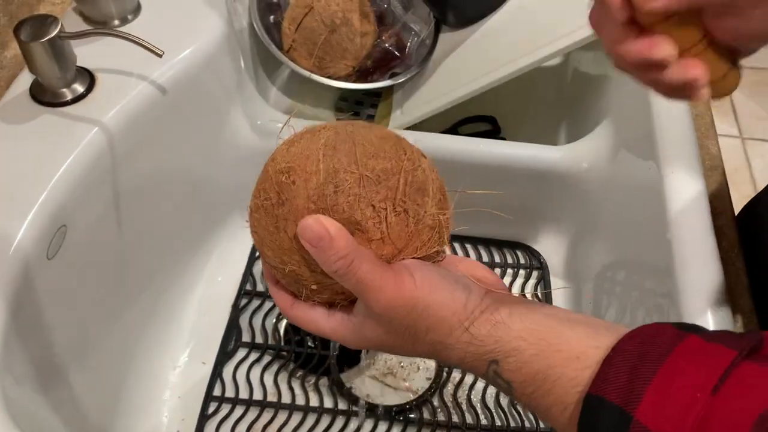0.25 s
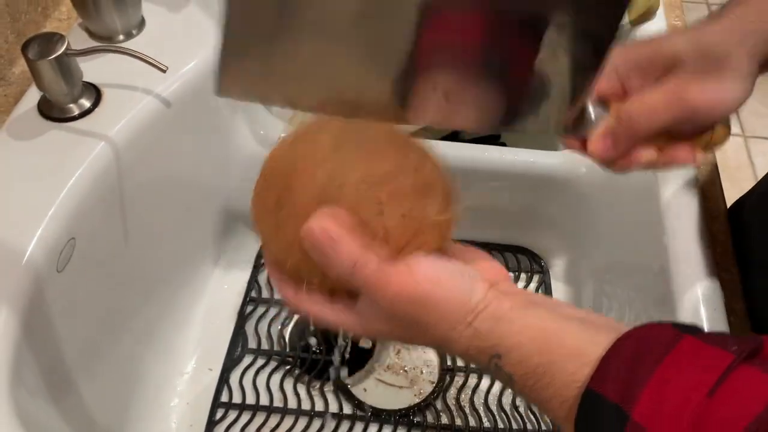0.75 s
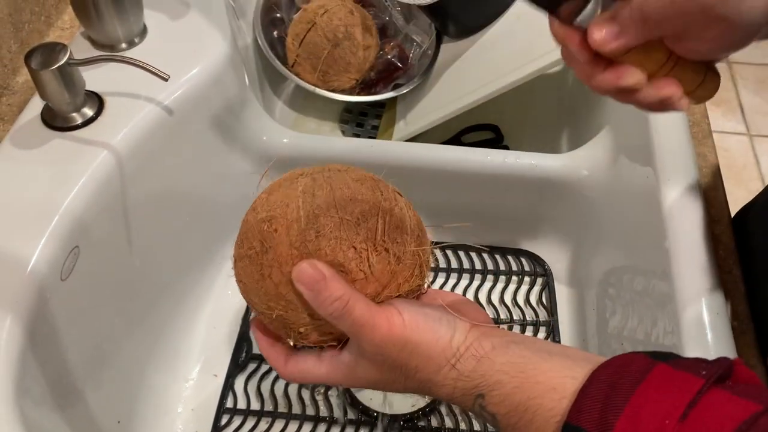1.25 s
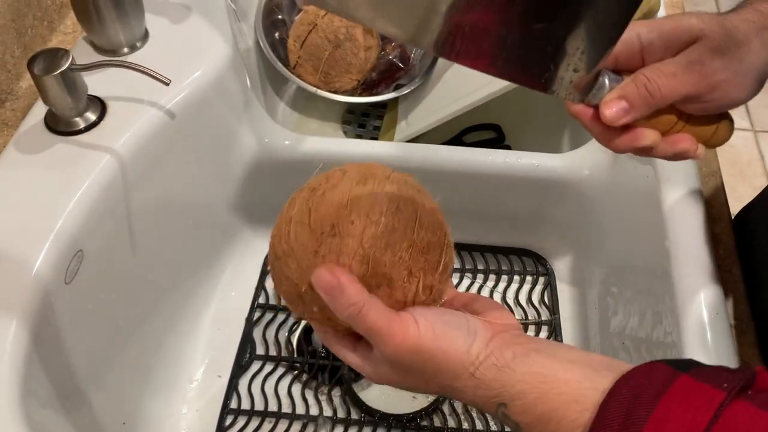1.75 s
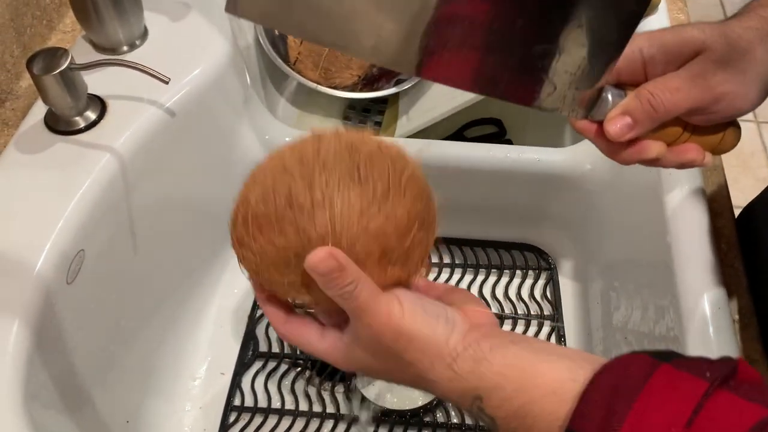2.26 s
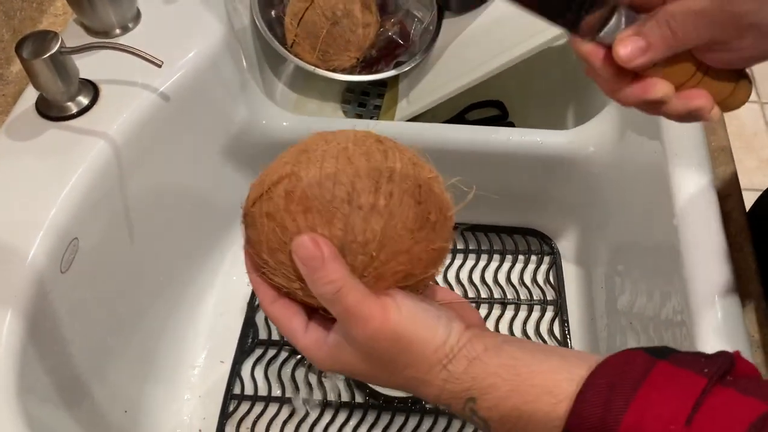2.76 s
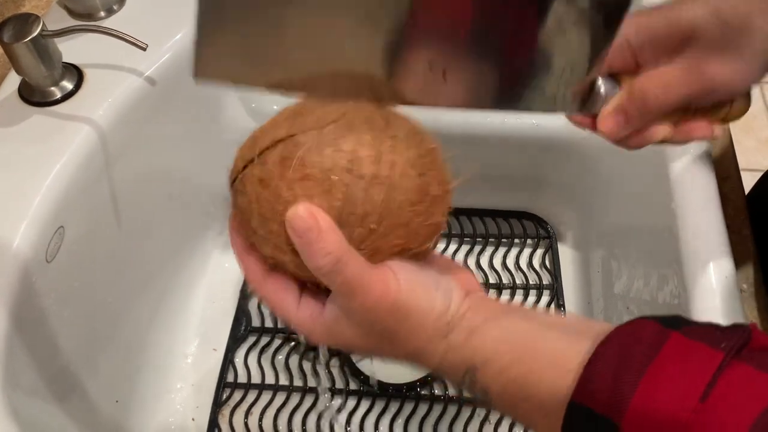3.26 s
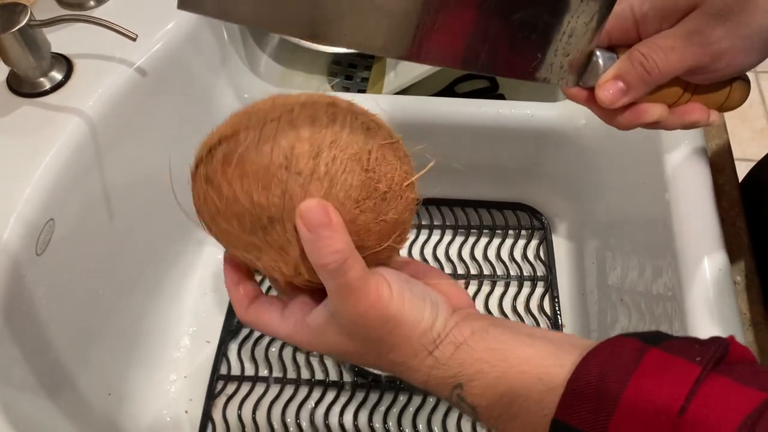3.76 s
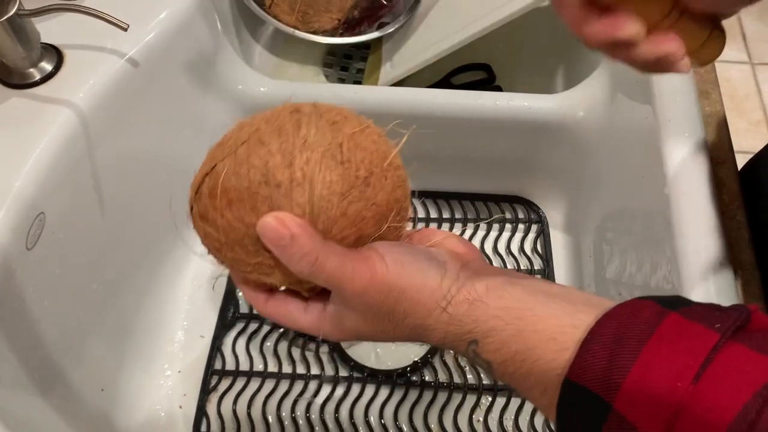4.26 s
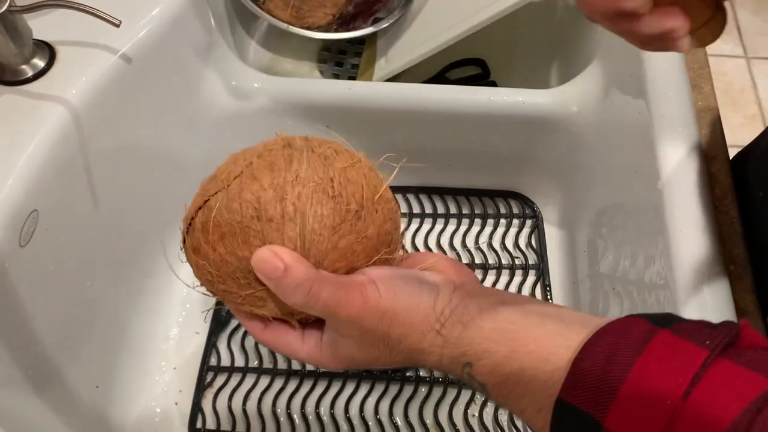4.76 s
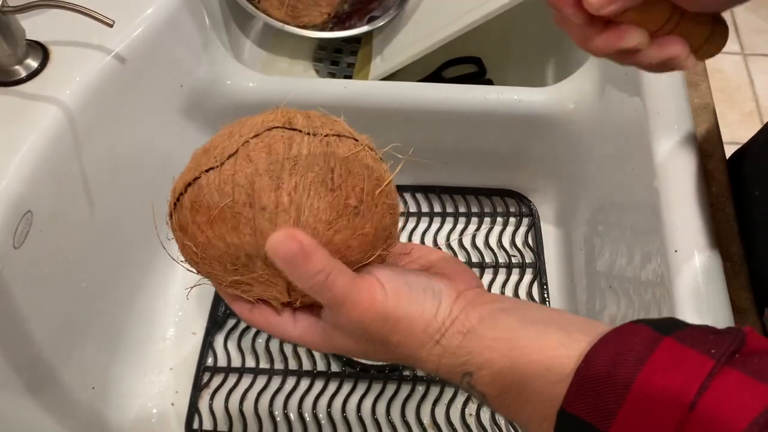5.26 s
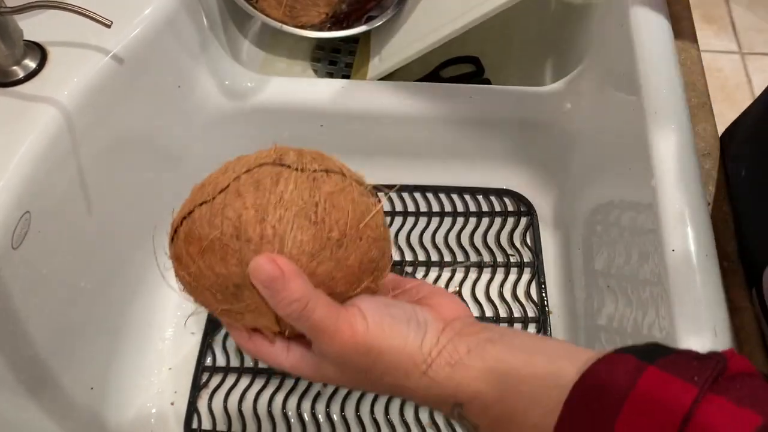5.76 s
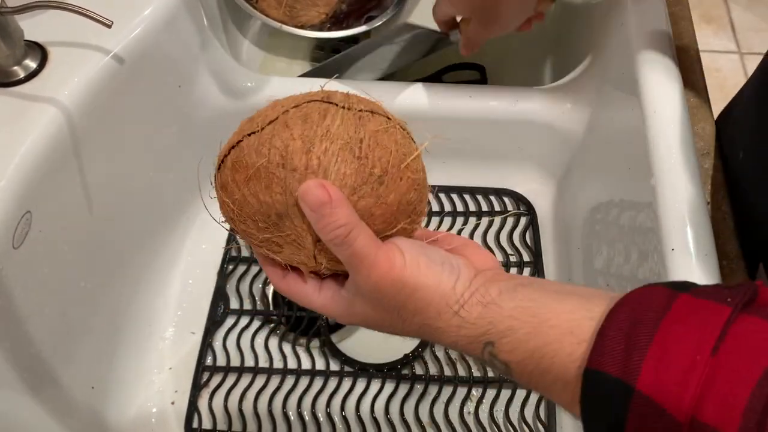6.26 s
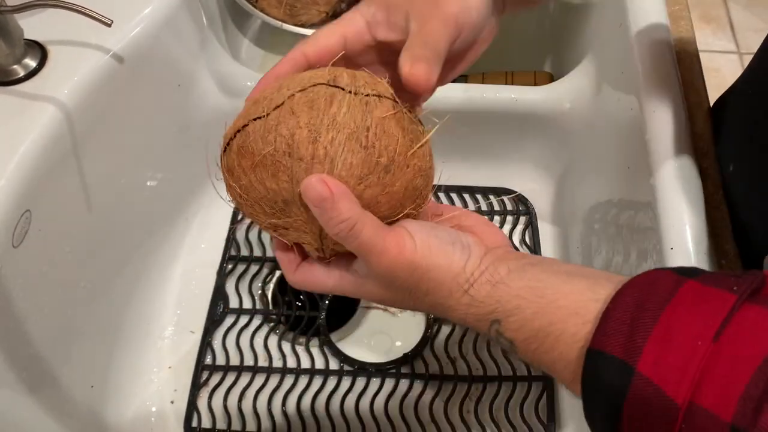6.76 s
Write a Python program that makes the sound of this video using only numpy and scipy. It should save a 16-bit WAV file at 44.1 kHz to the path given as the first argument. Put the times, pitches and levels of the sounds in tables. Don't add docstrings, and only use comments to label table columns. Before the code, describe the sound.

Close stereo in a small hard kitchen: a heavy knife back strikes a hand-held coconut six times in three pairs. Sharp, hollow cracks grow duller as the shell breaks, each with a thin ringing of the blade. Drips spatter on the sink mat and the nut thuds softly in the palm between pairs. Finally the knife clatters into the next basin. Automatic level lets the echo swell back after each blow.

```python
import sys
import numpy as np
from scipy import signal
from scipy.fft import rfft, irfft, next_fast_len
from scipy.io import wavfile
from scipy.ndimage import uniform_filter1d, minimum_filter1d

SR = 44100
rng = np.random.default_rng(int(sys.argv[2]) if len(sys.argv) > 2 else 0)


def undo_db(level):
    steps = np.asarray(level, float) / 20
    return 10 ** steps


def waveform_to_disk(signal):
    frames = np.transpose(np.atleast_2d(signal))
    scaled = np.clip(frames, -1, 1) * 32767
    samples = np.round(scaled).astype(np.int16)
    wavfile.write(sys.argv[1], SR, samples)


N = 309878
TIME = np.arange(N) / SR

# frequency in Hz, level in dB per Hz.
EDGE = [(2350, -43), (4000, -10), (7280, -14), (8650, 3), (9620, -1.5), (11800, -8.5), (13200, -5),
        (15500, -27), (16500, -32.5)]
# frequency in Hz, level in dB per Hz.
CLANK = [(290, -34), (500, -12.5), (568, -5), (814, -13.5), (2340, -5.5), (2780, -7), (3020, -9),
         (5090, -6.5), (8000, -14.5), (10400, -41.5), (17600, -120)]
# start in seconds, splat in dB, bubble pitch in Hz, bubble in dB.
PLOPS = [(0.0139, -30, 6330, -34), (.125, -65.5, 1100, 13.5), (.16, -69, 1400, 9.5), (0.1978, -31, 5450, 5),
         (0.2138, -25.5, 5000, 3), (0.2464, -25.5, 5820, -12), (1.2954, -38, 4260, 6),
         (1.3198, -30, 4680, 6.5), (1.4446, -38, 5530, 3), (1.5856, -27.5, 3245, 3.5),
         (1.6507, -29.5, 5300, -2), (1.678, -24.5, 5000, -1.5), (1.7111, -34, 3800, 8),
         (1.857, -31, 4350, -12), (1.9554, -31.5, 4480, 0), (1.9774, -23.5, 4320, 1.5),
         (2.1062, -26, 2140, -12.5), (2.1554, -31, 2040, -10), (2.183, -43.5, 1640, 6.5),
         (2.2512, -33.5, 2840, -5), (2.4053, -39, 3430, 12.5), (2.527, -37.5, 2570, 4),
         (2.56, -74.5, 900, 8.5), (2.61, -75.5, 1142, 10.5), (2.66, -73.5, 800, 9.5),
         (2.8371, -30.5, 3850, 0), (3.4978, -32, 4150, -9.5), (3.6646, -41, 5670, 11),
         (4.0095, -43.5, 4210, 7.5), (4.13, -61, 2700, 12)]
# frequency in Hz, phase in radians.
NUT_LEAD = [(0, 0.32), (1290, 2.1), (2580, 8.2), (4480, 2.8), (5170, 11.43), (7840, 18), (15500, 0.4),
            (16200, 22)]
# frequency in Hz, difference in dB.
NUT_PAN = [(200, 0), (450, -5.5), (1300, 10.5), (4000, -5.5), (12000, -1.5)]


def unit(x):
    return x / np.sqrt(np.mean(x ** 2) + 1e-20)


def along(points, hz):
    f, v = np.transpose(points)
    return np.interp(np.log(hz + 1), np.log(f + 1), v)


def filtered(x, response):
    m = next_fast_len(x.shape[-1] + 4096)
    spectrum = rfft(x, m) * response(np.fft.rfftfreq(m, 1 / SR))
    return irfft(spectrum, m)[..., :x.shape[-1]]


def noise(spectrum, size):
    return unit(filtered(rng.standard_normal(size), lambda hz: undo_db(along(spectrum, hz))))


def dying(t60s, seconds, channels):
    size = round(seconds * SR)
    hz, t, z = signal.stft(rng.standard_normal((channels, size)), SR, nperseg=128)
    fade = undo_db(-60 * t / along(t60s, hz)[:, None])
    return signal.istft(z * fade, SR, nperseg=128)[1][:, :size]


def ring(modes, t, rise, scatter_db):
    total = 0
    for hz, db, t60 in modes:
        level = undo_db(db + scatter_db * rng.standard_normal() - 60 * t / t60)
        total = total + level * np.sin(2 * np.pi * hz * t)
    return total * (1 - np.exp(-t / rise))


def chance(rate):
    knots = N * rate // SR + 2
    return np.interp(TIME * rate, np.arange(knots), rng.standard_normal(knots))


def add(track, s, x):
    part = track[..., max(round(s * SR), 0):][..., :x.shape[-1]]
    part += x[..., :part.shape[-1]]


def placed(x, lead, pan):
    def half(hz):
        turn = np.interp(hz, *np.transpose(lead)) * hz ** 2 / (hz ** 2 + 300 ** 2)
        return undo_db(along(pan, hz) / 2) * np.exp(.5j * turn)
    return filtered(x, lambda hz: np.array([half(hz), 1 / half(hz)]))


def blows():
    # start in seconds, crack in dB, shell in dB, echo in dB, steel tick in dB.
    strikes = [
        (0.375, -9, -1, -0.5, -1),
        (0.7716, -6, 2.5, -0.5, -1.5),
        (2.8908, -10.5, -7.5, 2, -2),
        (3.236, -6.5, -6, 1.5, -6),
        (4.3799, 1, -8, -2, -6.5),
        (4.847, -1.5, -9, 0, -11),
    ]
    # frequency in Hz, level in dB, t60 in seconds.
    shells = [
        [(318, -19, .1), (205, -21, .1), (490, -25, .22), (860, -21, .07), (1150, -21, .04), (2080, -17, .035),
         (2580, -19, .035)],
        [(374, -25, .15), (493, -21, .25), (541, -24, .22), (210, -21, .1), (950, -25, .07), (1300, -19, .035),
         (1900, -19, .035)],
        [(315, -21, .1), (248, -20, .1), (700, -22, .1), (1055, -18, .05), (1217, -21, .06), (1545, -24, .08),
         (2304, -20, .045)],
        [(318, -23, .1), (248, -19, .13), (891, -23, .05), (1180, -27, .1), (1630, -24, .04), (2011, -19, .04)],
        [(225, -19, .1), (615, -22, .09), (1101, -15, .035), (1210, -28, .1), (1510, -21, .08),
         (2300, -17, .06), (2673, -19, .045)],
        [(310, -21, .12), (460, -23, .1), (606, -19, .09), (1096, -19, .045), (1330, -23, .05),
         (2291, -20, .045), (2725, -16, .06)],
    ]
    # frequency in Hz, level in dB, t60 in seconds.
    blade = [(9500, -39, .12), (12900, -46, .08), (5670, -40.5, 0.054)]
    # frequency in Hz, level in dB per Hz.
    crack = [(35, -39), (60, -16.5), (422, -3.5), (1850, -10), (2640, -12.5), (4120, -13.5), (8540, -18),
             (10100, -17), (11600, -26.5), (13400, -16), (15700, -26), (16500, -40.5)]
    # frequency in Hz, t60 in seconds.
    crack_t60 = [(100, 0.4), (1000, 0.065), (5000, 0.044), (14000, 0.047)]
    # frequency in Hz, change in dB.
    husk = [(300, -14), (700, -9.5), (1100, -3), (1600, -1.5)]
    # frequency in Hz, level in dB, t60 in seconds.
    thump_modes = [(115, -13, 0.12), (155, -9.5, 0.11), (192.8, -16, 0.15)]
    # frequency in Hz, loss in dB.
    far_loss = [(300, 5), (560, 4), (800, 6), (1100, 2.5), (3000, 1), (8000, 0), (14000, -0.5)]
    out, t = np.zeros((2, N)), np.arange(int(.7 * SR)) / SR
    lead = 640
    for (s, db, shell_db, echo_db, tick_db), modes in zip(strikes, shells):
        burst = dying(crack_t60, len(t) / SR, channels=1)[0]
        burst = filtered(burst, lambda hz: undo_db(along(crack, hz) + along(husk, hz)))
        body = undo_db(1.5) * ring(modes, t, .004, scatter_db=1)
        thump = ring(thump_modes, t, 0.0039, scatter_db=3)
        tick = undo_db(tick_db + 0.5 - 60 * t / 0.0027) * noise(EDGE, size=len(t))
        hit = burst / np.abs(burst).max() * undo_db(1.5) + tick + undo_db(shell_db) * thump
        hit = hit + ring(blade, t, 0.0034, scatter_db=4.5)
        crush = undo_db(-25.5 - shell_db - 2000 * t[lead:0:-1]) * noise(CLANK, size=lead)
        hit = undo_db(db + 6.5) * np.concatenate([crush, hit]) + np.pad(body, (lead, 0))
        click = 1. * (np.arange(len(hit)) == lead)
        bang = filtered(click, lambda hz: undo_db(along(crack, hz) - along(far_loss, hz)))
        short_body = np.pad(body * undo_db(-60 * t / .08), (lead, 0))
        far = bang / np.linalg.norm(bang) + undo_db(shell_db - 2) * short_body
        both = placed(hit, NUT_LEAD, NUT_PAN) + undo_db(db + echo_db + 14.5) * echo(far)
        add(out, s - lead / SR, both)
    return out


def knocks():
    # start in seconds, level in dB, pitch in Hz, swell in seconds.
    squeezes = [(.3752, -5, 540, .0045), (.389, -13, 300, .006), (.7722, -4, 500, .0045),
                (2.8905, -7.5, 370, .005), (3.2365, -9, 360, .005), (3.249, -18, 170, .006),
                (4.371, -19, 610, .004), (4.3797, -6, 440, .0033), (4.389, -14, 260, .005),
                (4.838, -18, 610, .004), (4.847, -6.5, 470, .0035)]
    out, t = np.zeros(N), np.arange(SR // 20) / SR
    sag = 12
    for s, db, hz, swell in squeezes:
        shape = (t / swell * np.exp(1 - t / swell)) ** 2
        add(out, s, undo_db(db) * shape * np.sin(2 * np.pi * hz * t * (1 - sag * t / 2)))
    return out


def sing():
    # start in seconds, level in dB, t60 in seconds, edge-on after seconds, still after seconds.
    tones = [
        (0.39, -64, 1.8, 0.02, 0.29),
        (0.789, -52, 0.6, 0.017, 0.34),
        (2.898, -38.5, 0.43, 0.043, 0.56),
        (3.25, -48.5, 0.82, 0.11, 0.85),
        (4.39, -39, 0.65, .005, 0.56),
        (4.863, -32.5, 0.53, 0.09, 1),
        (6.3, -60.5, 1.3, 0.019, 0.19),
        (6.489, -57, 1.4, 0.094, 0.47),
        (6.66, -50, 0.29, .02, 0.49),
    ]
    level, t = np.zeros(N), np.arange(SR) / SR
    for s, db, t60, turn_s, still_s in tones:
        facing = 1 - .75 * np.exp(-((t - turn_s) / .02) ** 2)
        fade = undo_db(db + 14.5 - 60 * t / t60 - 30 * (t / still_s) ** 4)
        add(level, s, fade * facing * np.minimum(t / 0.0036, 1))
    tone_hz = 4243
    left_right_phase = np.array([[.6], [-.6]])
    return level * np.sin(2 * np.pi * tone_hz * TIME + left_right_phase)


def knife_down():
    # start in seconds, edge in dB, clank in dB, basin in dB, scrape t60 in seconds.
    contacts = [(6.109, -51.5, -51.5, -58, .1), (6.1208, -14, -37, -38, 0.068),
                (6.1359, -6, -31.5, -49, 0.056), (6.1436, -8, -30.5, -52, 0.06),
                (6.1521, -21.5, -31.5, -57, 0.17), (6.1733, -30, -24, -30, 0.19),
                (6.1942, -19.5, -53, -57, 0.093), (6.2073, -23, -28, -34, 0.035),
                (6.3011, -29.5, -27, -70, 0.07), (6.309, -30.5, -34, -35.5, 0.12),
                (6.225, -34, -39, -34.5, .1), (6.461, -50, -29.5, -39, 0.11),
                (6.4688, -12, -9.5, -23, 0.12), (6.5174, -20, -45, -31.5, 0.074),
                (6.583, -23.5, -21, -20.5, 0.29), (6.6234, -5, -18, -14.5, 0.12),
                (6.6479, -14.5, -25, -33, 0.057), (6.683, -32, -25, -25.5, 0.092)]
    # frequency in Hz, level in dB per Hz.
    basin = [(15, -9), (25, -30), (49, 4), (258, -3.5), (298, -4.5), (392, -4), (447, -8), (570, -8.5),
             (1200, -7), (1560, -21.5), (2640, -120)]
    # frequency in Hz, level in dB, t60 in seconds.
    steel_modes = [(324, -7, 0.06), (1080, -5, 0.05), (1246, -3, 0.07), (2207, -6, .11), (2285, -8, .11),
                   (2422, -9, .1), (3079, -6, .12), (5505, -7, .12), (6125, -8, 0.12), (7120, -12, .1),
                   (9588, -10, 0.1)]
    # start in seconds, level in dB, pitch in Hz, t60 in seconds.
    favoured = [(6.137, -33, 9302, .15), (6.137, -32, 9588, .15), (6.14, -38, 10113, .12),
                (6.137, -38, 7631, .1), (6.174, -38, 4237, .4), (6.21, -39, 2498, .12),
                (6.195, -43, 6124, .2), (6.215, -46, 5494, .15), (6.304, -45, 2180, .15),
                (6.304, -46, 1249, .15), (6.304, -46, 3933, .1), (6.31, -50, 6250, .2),
                (6.47, -24, 1244, .07), (6.47, -27, 1776, .06), (6.47, -28, 2433, .1),
                (6.478, -28, 3060, .17), (6.472, -28, 5512, .2), (6.47, -28, 3850, .07),
                (6.482, -31, 6270, .08), (6.525, -34, 4285, .2), (6.585, -30, 1139, .07),
                (6.592, -27, 3082, .13), (6.585, -28, 285, .3), (6.585, -32, 342, .15),
                (6.625, -26, 299, .2), (6.644, -27, 6126, .15), (6.625, -32, 2387, .15),
                (6.6, -39, 4253, .15), (6.683, -38, 4245, .2), (6.71, -41, 4260, .12),
                (6.683, -36, 1000, .06), (6.63, -37, 5500, .15), (6.755, -42, 4240, .15)]
    out, t = np.zeros(N), np.arange(SR // 3) / SR
    grit = unit(undo_db(3.5 * chance(160)))
    for s, edge_db, clank_db, basin_db, t60 in contacts:
        edge = undo_db(edge_db - 4.5 - 60 * t / t60) * noise(EDGE, size=len(t))
        clank = undo_db(clank_db - 5 - 60 * t / (1.64 * t60)) * noise(CLANK, size=len(t))
        scrape = (edge + clank) * grit[round(s * SR):][:len(t)] * (1 - np.exp(-t / 0.0013))
        steel = undo_db(clank_db - 6.5) * ring(steel_modes, t, 0.003, scatter_db=5.0)
        swell = 1 - np.exp(-t / 0.0045)
        boom = undo_db(basin_db - 1.0 - 60 * t / 0.18) * swell * noise(basin, size=len(t))
        add(out, s, scrape + steel + boom)
    for s, db, hz, t60 in favoured:
        add(out, s, ring([(hz, db + 3, t60)], t, .003, scatter_db=0))
    return out


def palm():
    # start in seconds, thud in dB, pitch in Hz, t60 in seconds, slap in dB.
    landings = [
        (0.009, -35.5, 429, 0.0053, -15),
        (1.245, -43, 170.3, 0.06, -30.5),
        (1.281, -39, 157.2, 0.036, -23.5),
        (1.496, -42.5, 156, 0.093, -39),
        (1.668, -34.5, 172, 0.083, -26.5),
        (2.273, -34, 154, 0.039, -30),
        (3.137, -41.5, 278, 0.13, -19.5),
        (3.926, -32, 690, 0.023, -0.5),
        (3.926, -39, 1500, 0.023, -9.5),
        (3.932, -28.5, 281, 0.05, -29.5),
    ]
    # frequency in Hz, level in dB per Hz.
    skin = [(100, -18.5), (400, 9), (900, -6), (2500, -20), (5000, -32.5), (16000, -77)]
    out, t = np.zeros(N), np.arange(SR // 4) / SR
    for s, db, hz, t60, slap_db in landings:
        thud = ring([(hz, 0, t60), (1.2 * hz, -9, 0.31 * t60)], t, 0.00067, scatter_db=2.0)
        slap = undo_db(slap_db - 60 * t / 0.11) * noise(skin, size=len(t))
        add(out, s, undo_db(db + 2.5) * (thud + slap))
    return out


def drops():
    # start in seconds, level in dB.
    mat_drops = [(0.1072, -34), (0.175, -26.5), (1.1717, -37.5), (1.232, -42.5), (1.5376, -32.5),
                 (1.8738, -22.5), (2.015, -40.5), (2.0618, -31.5), (2.0816, -29), (2.2618, -28.5),
                 (2.2856, -19.5), (2.331, -36.5), (2.3726, -31), (2.5036, -24), (2.7492, -33),
                 (2.796, -25.5), (3.5167, -29), (3.5687, -45.5), (3.8464, -28), (3.8875, -31),
                 (3.9262, -25.5), (3.9702, -27), (4.0579, -38), (4.1943, -47.5), (4.2802, -38.5)]
    # start in seconds,
    # level in dB.
    clicks = [(0.4963, -29), (0.5342, -44), (0.5737, -46), (0.6471, -44), (0.9333, -40), (0.9865, -39),
              (1.1707, -39.5), (1.23, -46), (2.5039, -34), (2.7502, -35.5), (3.8464, -34.5), (3.0014, -32),
              (3.0611, -39), (3.1962, -42.5), (4.7956, -55), (5.0545, -52), (5.7123, -54.5), (6.945, -79),
              (6.9894, -45.5)]
    # frequency in Hz, level in dB per Hz.
    splat_colour = [(710, -61), (1200, -46), (2730, -10), (7410, -5.5), (8730, 7), (9850, -1), (13700, -9),
                    (14700, -22.5), (15700, -15), (16500, -30.5)]
    out, t = np.zeros(N), np.arange(SR // 20) / SR
    on_mat = [(s, db, 4180, -24) for s, db in mat_drops]
    for s, db, hz, bubble_db in PLOPS + on_mat:
        delays, ratios = 0.013 * rng.random(2), np.exp(0.19 * rng.standard_normal(2))
        weaker = zip(delays, ratios, -7 - 8 * rng.random(2))
        for late, ratio, weak_db in [(0, 1, 0), *weaker]:
            rising = np.sin(2 * np.pi * hz * ratio * t * (1 + 6 * t))
            bubble = rising * undo_db(-60 * t / (30 / hz)) * (1 - np.exp(-t / 0.00036))
            add(out, s + late, undo_db(db + bubble_db + 5.0 + weak_db) * bubble)
        fade = undo_db(-60 * t / 0.023) + undo_db(-11.0 - 60 * t / 0.17)
        add(out, s, noise(splat_colour, size=len(t)) * undo_db(db - 9.5) * fade)
    for s, db in clicks:
        add(out, s, noise(EDGE, size=len(t)) * undo_db(db + 0.5 - 60 * t / 0.027))
    return out


def stream():
    # time in seconds, level in dB.
    flow_curve = [(0, -48), (0.09, -60.5), (0.3, -52.5), (1.1, -70.5), (1.33, -55.5), (1.7, -54),
                  (1.82, -56.5), (2.45, -51), (2.71, -61.5), (2.82, -52.5), (3.5, -60), (3.65, -54.5),
                  (3.8, -62.5), (4.12, -59.5), (4.3, -58), (5.4, -79.5), (5.9, -76), (7.02, -57.5)]
    # start in seconds, level in dB.
    shakes = [(0, -56), (0.129, -57.5), (1.251, -68), (1.682, -41.5), (1.9, -61), (2.29, -41),
              (2.54, -54.5), (2.81, -69), (3.549, -62), (3.919, -44), (5.28, -66)]
    # frequency in Hz, level in dB per Hz.
    fizz = [(2350, -29.5), (4000, -17), (7590, -5.5), (8700, -3.5), (10300, -5.5), (11800, -14.5),
            (13400, -2), (14800, -16.5), (15700, -15), (16500, -35)]
    # frequency in Hz, level in dB per Hz.
    trickle_colour = [(290, -35.5), (500, -2.5), (752, -14), (1740, -8), (2770, -2.5), (2990, 4),
                      (3610, 1.5), (7000, -6), (9100, -38), (15400, -120)]
    flow = undo_db(np.interp(TIME, *np.transpose(flow_curve)))
    mist, slosh = np.zeros(N), np.zeros(N)
    for s, db, *_ in PLOPS:
        mist += undo_db(db - 31) * np.exp(-((TIME - s) / 0.036) ** 2)
    for s, db in shakes:
        swell = np.exp(np.minimum(TIME - s, 0) / 0.018)
        slosh += undo_db(db - 60 * np.maximum(TIME - s, 0) / 0.32) * swell
    spray_surge = undo_db(4 * chance(500) + 6.5 * chance(90) + 3 * chance(20))
    spray = unit(spray_surge * noise(fizz, size=N))
    trickle_surge = undo_db(4 * chance(150) + 6 * chance(35))
    trickle = unit(trickle_surge * noise(trickle_colour, size=N))
    return (flow + mist) * spray + (undo_db(-7.5) * flow + slosh) * trickle


def squeaks():
    # start in seconds, level in dB, pitch in Hz, length in seconds.
    blips = [(4.255, -60, 980, 0.035), (5.408, -65, 3176, 0.022), (5.412, -71, 3620, .028),
             (5.479, -69, 3170, 0.024), (5.482, -70.5, 3650, 0.025), (5.51, -66, 3630, 0.029),
             (5.537, -52, 3606, 0.033), (5.533, -68, 3180, 0.024), (5.602, -70, 3660, .022),
             (5.721, -68, 3630, .022), (5.787, -61, 3310, .022), (5.791, -63, 3640, 0.025),
             (6.052, -55, 3600, 0.058)]
    out, t = np.zeros(N), np.arange(SR // 10) / SR
    for s, db, hz, length in blips:
        wobble = np.cumsum(0.05 * rng.standard_normal(len(t)))
        shape = np.clip(np.minimum(t / 0.0021, (length - t) / 0.018), 0, 1)
        add(out, s, undo_db(db - 0.5) * np.sin(2 * np.pi * hz * t + wobble) * shape)
    return out


def diffuse(pair):
    # frequency in Hz, likeness of left and right from 0 to 1.
    alike = [(60, 0.99), (300, 0.74), (800, 0), (2000, 0.17), (12000, 0.13)]

    def mid_side(hz):
        turn = np.arccos(np.clip(along(alike, hz), -1, 1)) / 2
        return np.array([np.cos(turn), np.sin(turn)])
    mid, side = filtered(pair, mid_side)
    return np.array([mid + side, mid - side])


def echo(x):
    # frequency in Hz, t60 in seconds.
    kitchen = [(100, 0.31), (500, 0.47), (2000, 0.46), (5000, 0.43), (13000, 0.14)]
    tail = diffuse(dying(kitchen, .65, channels=2))
    late = np.pad(x, (90, 0))[None]
    return signal.fftconvolve(late, tail / np.linalg.norm(tail[0]), axes=1)[:, :len(x)]


def room_tone():
    # frequency in Hz, level in dB per Hz.
    hum = [(26, -38), (45, -14), (146, -3.5), (190, -5.5), (293, -10.5), (474, -24), (602, -26.5),
           (997, -34), (8450, -45), (12100, -38.5), (14000, -46.5)]
    return undo_db(-63) * unit(diffuse(np.array([noise(hum, size=N), noise(hum, size=N)])))


def scene():
    # frequency in Hz, phase in radians.
    mat_lead = [(0, -2), (2760, -2), (4220, -5.5), (6630, 1), (8010, -2.0), (14000, -13), (14400, -13.5),
                (16200, -15.5)]
    basin_lead = [(0, 1), (4220, 0.47), (6550, 8.5), (8270, 4), (13100, -6), (14100, -3.5), (14500, -5.5),
                  (16200, -13.5)]
    # frequency in Hz, difference in dB.
    mat_pan = [(300, 0.037), (4000, 0.0038)]
    basin_pan = [(200, -0.5), (600, -4), (1300, 9.5), (4000, -2), (12000, -0.5)]
    knife, hand, wet = knife_down(), palm(), drops() + stream()
    near = placed(hand + knocks(), NUT_LEAD, NUT_PAN)
    near = near + placed(wet + squeaks(), mat_lead, mat_pan)
    near = near + placed(knife, basin_lead, basin_pan)
    echoes = undo_db(-10.5) * echo(wet) + undo_db(-13.5) * echo(hand) + undo_db(-9) * echo(knife)
    return blows() + sing() + near + echoes + room_tone()


def band_limit(x):
    return signal.sosfilt(signal.butter(12, 16650, fs=SR, output="sos"), x)


def record(dry):
    # frequency in Hz, width in Hz, depth from 0 to 1.
    notches = [(8590, 120, 0.3), (11660, 220, 0.6)]
    over_db = np.maximum(20 * np.log10(np.abs(dry).max(0) + 1e-9) + 0.73, 0)
    hold = int(.11 * SR)
    held_db = -minimum_filter1d(-over_db, size=hold)
    held_db = np.pad(held_db, (hold // 2 - 96, 0))[:N]
    climb_db = 105 * TIME
    duck_db = np.maximum.accumulate(held_db + climb_db) - climb_db
    x = dry * undo_db(-uniform_filter1d(duck_db, size=129))

    def notched(hz):
        dips = [1 - np.clip(deep, 0, 1) * np.exp(-((hz - c) / w) ** 2) for c, w, deep in notches]
        return np.prod(dips, axis=0)
    return band_limit(filtered(x, notched))


dry = scene()
out = record(dry)
waveform_to_disk(out)
```